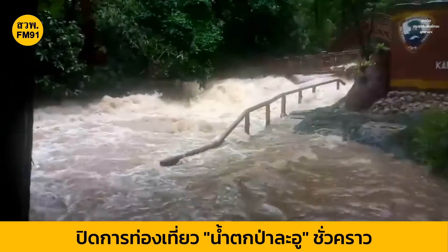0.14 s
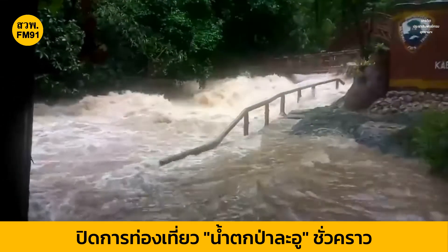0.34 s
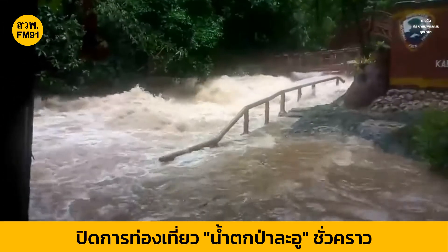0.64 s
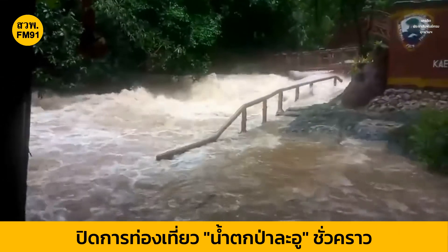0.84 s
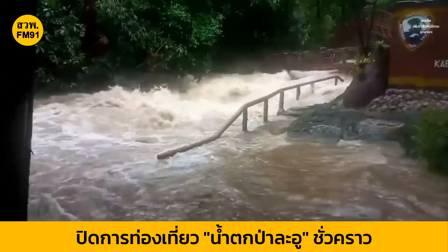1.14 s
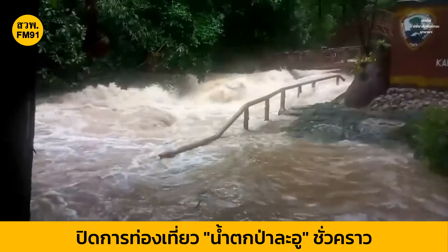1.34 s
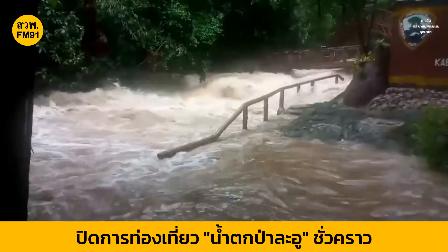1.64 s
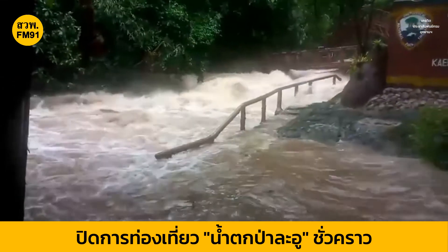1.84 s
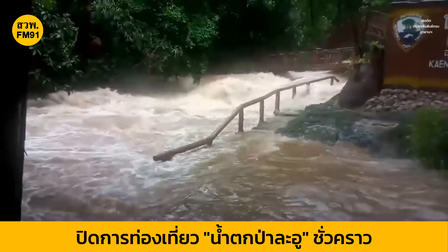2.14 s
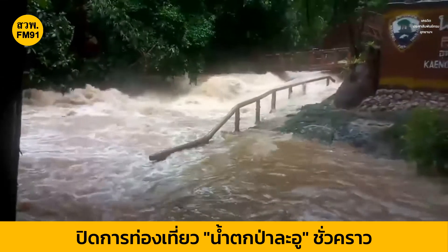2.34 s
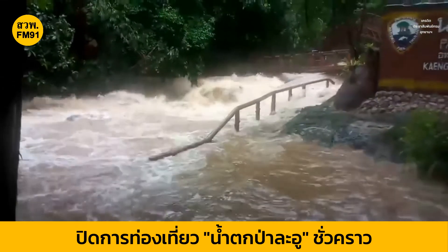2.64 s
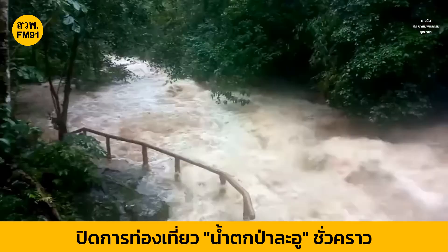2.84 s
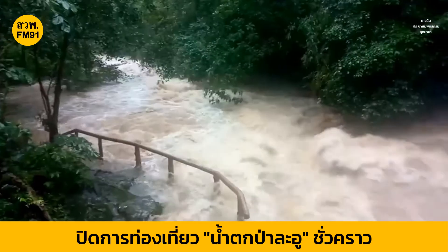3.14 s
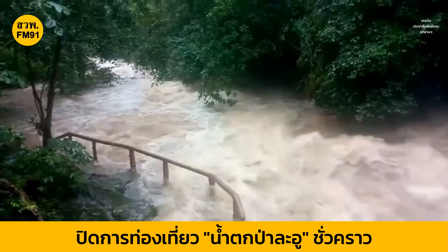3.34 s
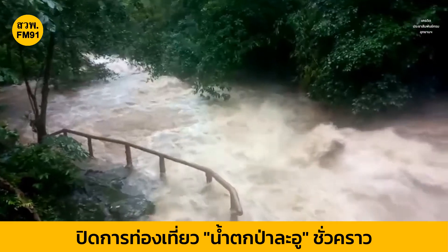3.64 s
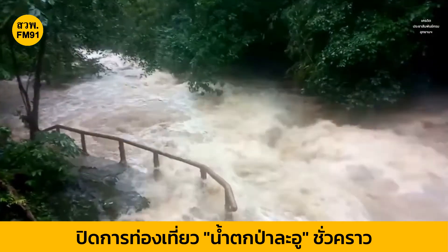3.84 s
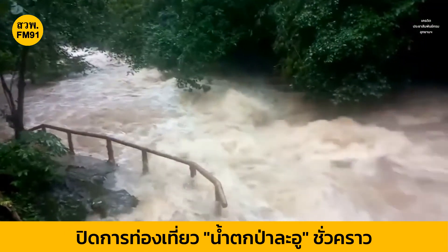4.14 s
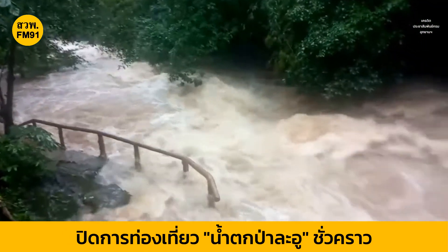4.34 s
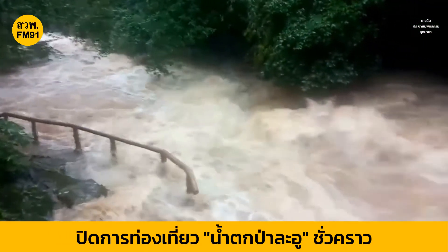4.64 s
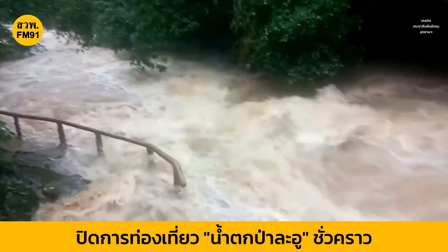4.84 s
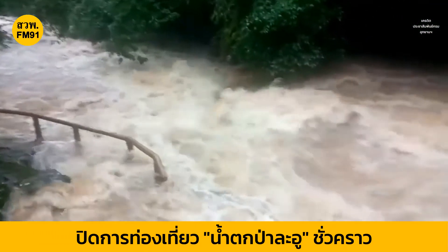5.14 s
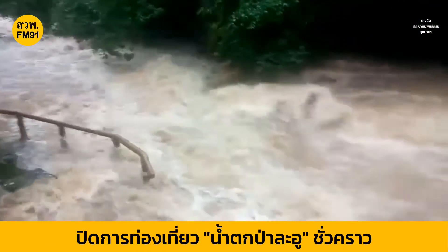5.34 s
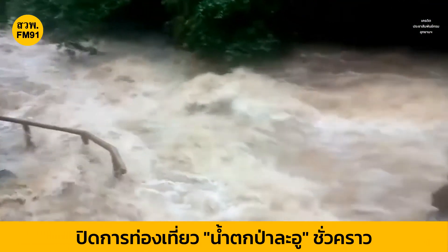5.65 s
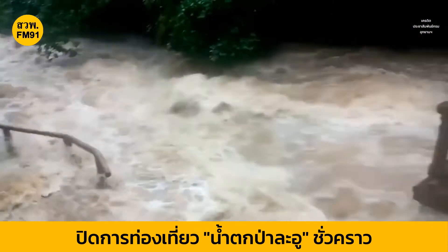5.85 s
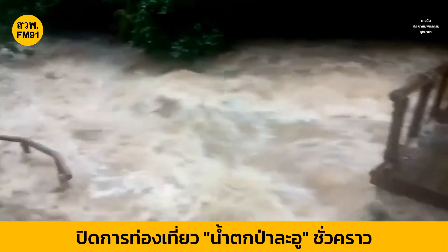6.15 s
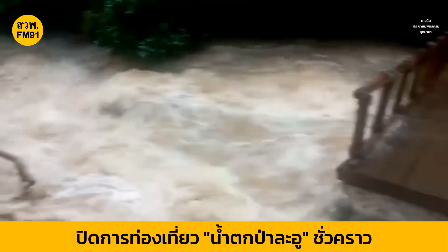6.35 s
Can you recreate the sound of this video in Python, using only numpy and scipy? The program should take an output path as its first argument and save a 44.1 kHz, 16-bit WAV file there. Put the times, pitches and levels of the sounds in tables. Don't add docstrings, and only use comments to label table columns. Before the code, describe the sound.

A swollen brown river roars over rocks, a wide unbroken rush with heavy low rumble. Just before the middle it is chopped off into complete silence for half a second. A brighter, hissier torrent then fades in fast and holds to the end. Outdoors on the bank, captured by a small mono microphone with edgy treble and brief compressed warbles.

```python
import sys
import numpy as np
from scipy import signal
from scipy.io import wavfile
from scipy.ndimage import uniform_filter1d

SR = 44100
rng = np.random.default_rng(int(sys.argv[2]) if len(sys.argv) > 2 else 0)


def transcribe(u):
    v = np.clip(np.atleast_2d(u).T, -1, 1)
    q = np.round(v * 32767).astype(np.int16)
    wavfile.write(sys.argv[1], SR, q)


def amplitude_ratio(level_db):
    exponent = np.asarray(level_db, float) / 20
    return 10 ** exponent


N = 286209

# frequency in Hz, density in dB per Hz.
UPSTREAM_ROAR_DB = [(25, -36), (50, -21), (97, 1), (180, 1), (470, -8.5), (620, -12), (2110, -8.5),
                    (5300, -13.5), (6600, -9), (7600, -11.5), (8200, -19), (9100, -22.5), (10400, -20),
                    (13600, -28)]
# frequency in Hz, density in dB per Hz.
FALLS_ROAR_DB = [(25, -42.5), (82, 0), (185, 2.5), (480, -7.5), (624, -4), (1070, -1), (1260, -6),
                 (1700, -3), (5000, -8.5), (6700, -0.5), (7500, -3), (8200, -11.5), (9320, -15.5),
                 (13200, -22)]
# time in seconds, level in dB, rumble over roar in dB.
UPSTREAM_SURGE = [
    (0.0, -22, -1),
    (2.74, -22, -0.5),
]
# time in seconds, level in dB, rumble over roar in dB.
FALLS_SURGE = [
    (3.6, -21.5, 0.0027),
    (5.76, -21.5, 0.005),
    (6.49, -21, 0.0),
]
# centre of first frame in seconds, length in frames.
STARVED_SPELLS = [(.073, 3), (.166, 1), (.375, 1), (.538, 2), (.886, 1), (1.002, 1), (1.443, 1), (1.536, 1),
                  (1.675, 1), (1.977, 1), (2.395, 1), (2.72, 1), (3.51, 1), (3.719, 6), (3.951, 1),
                  (4.206, 1), (4.253, 1), (4.624, 1), (4.88, 1), (4.926, 2), (5.042, 1), (5.251, 1),
                  (6.11, 1), (6.482, 1)]
# time in seconds, number of bands.
SPLIT_FRAMES = [
    (1.51, 1),
    (1.649, 3),
    (1.881, 2),
    (2.508, 4),
    (3.321, 2),
    (4.575, 1),
    (4.9, 1),
]
# frequency in Hz, band level over step in dB.
STEREO_FINENESS_DB = [(200, 22.5), (800, 15), (1600, 12), (4000, 11), (6300, 14), (8600, 8), (12500, 5.5),
                      (14500, 10.5)]

HOP = 1024
LINK_GRID, STEREO_GRID = 156, 28
LINK_TOP_LINE, STEREO_TOP_LINE = 731, 735
LINE_HZ = (np.arange(HOP) + .5) * SR / (2 * HOP)


def bubbles(per_s, spread_db, cycles, count=16):
    out = np.zeros(N)
    for hz in np.geomspace(150, 15000, count):
        t = np.arange(int(4 * cycles * SR / hz)) / SR
        rising = np.sin(2 * np.pi * hz * t * (1 + .04 * hz * t / cycles))
        chirp = rising * t * np.exp(-2 * hz * t / cycles)
        chance, size = rng.random(N), rng.exponential(1, N)
        bursts = chance < per_s * hz / 1e5 / SR
        train = bursts * amplitude_ratio(spread_db * np.minimum(size, 5))
        out += np.sqrt(hz) * evened(signal.oaconvolve(train, chirp)[:N])
    return evened(out)


def evened(x):
    return x / np.sqrt(np.mean(x ** 2) + 1e-20)


def read(points, hz):
    table_hz, table_db = np.transpose(points)
    return np.interp(np.log(hz + 1), np.log(table_hz + 1), table_db)


def microphone_db(hz):
    lift_hz, lift_width_hz, lift_db = 14020, 290, 9
    port_hz, port_width_hz, port_db = 6570, 210, 1.5
    lift = lift_db * np.clip((hz - lift_hz) / lift_width_hz, 0, 1)
    return lift + port_db / (1 + (2 * (hz - port_hz) / port_width_hz) ** 2)


def torrent(churn, roar, surge, patchy_db, gust_db):
    hz, t, z = signal.stft(churn, SR, nperseg=2048, noverlap=1536)
    mean_power = np.mean(abs(z) ** 2, 1)
    z = z / np.sqrt(uniform_filter1d(mean_power, size=9))[:, None]
    patches = uniform_filter1d(rng.standard_normal(z.shape), size=12, axis=0)
    patches = evened(uniform_filter1d(patches, size=7, axis=1))
    patches *= (1 + 1.5 * hz / 1e4)[:, None]
    gusts = evened(uniform_filter1d(rng.standard_normal(len(t)), size=3))
    surge_s, level_db, rumble_db = np.transpose(surge)
    colour_db = read(roar, hz) + microphone_db(hz)
    rumble_share = 1 / (1 + (hz / 350) ** 4)
    field_db = colour_db[:, None] + np.outer(rumble_share, np.interp(t, surge_s, rumble_db))
    field_db += patchy_db * patches + gust_db * gusts
    z = z * amplitude_ratio(field_db) * (hz < 15900)[:, None]
    water = signal.istft(z, SR, nperseg=2048, noverlap=1536)[1][:N]
    return evened(water) * amplitude_ratio(np.interp(np.arange(N) / SR, surge_s, level_db) + 1.0)


def upstream(churn):
    cut_s, cut_fall_s = 2.7595, .0027
    t = np.arange(N) / SR
    cut = np.clip((cut_s + cut_fall_s - t) / cut_fall_s, 0, 1) ** 2
    return cut * torrent(churn, UPSTREAM_ROAR_DB, UPSTREAM_SURGE, patchy_db=0.42, gust_db=0.29)


def falls(churn):
    fade_s, fade_rise_s, fade_start = 3.2617, .29, .06
    t = np.arange(N) / SR
    fade = (t > fade_s) * np.clip(fade_start + (t - fade_s) / fade_rise_s, 0, 1)
    return fade * torrent(churn, FALLS_ROAR_DB, FALLS_SURGE, patchy_db=0.25, gust_db=0.5)


def scene():
    churn = rng.standard_normal(N) + amplitude_ratio(-5.0) * bubbles(per_s=40000, spread_db=3.5, cycles=5.0)
    return np.tile(upstream(churn) + falls(churn), (2, 1))


def reframed(x, grid, window, change):
    basis = np.cos(np.pi / HOP * np.outer(np.arange(2 * HOP) + (HOP + 1) / 2, np.arange(HOP) + .5))
    basis *= window[:, None] * np.sqrt(2 / HOP)
    blocks = np.pad(x, (2 * HOP - grid, 2 * HOP + (grid - N) % HOP)).reshape(-1, HOP)
    lines = np.hstack([blocks[:-1], blocks[1:]]) @ basis
    frames = change(lines) @ basis.T
    return (frames[1:, :HOP] + frames[:-1, HOP:]).ravel()[HOP - grid:][:N]


def frame_at(s, grid):
    return np.round((np.asarray(s) * SR - grid) / HOP).astype(int) + 1


def starve(lines):
    step_db, scatter_db, edge_finer_db, bass_hz, treble_hz = 1.8, .5, 1.3, 550, 9500
    rows = np.concatenate([frame_at(s, LINK_GRID) + np.arange(frames) for s, frames in STARVED_SPELLS])
    starved = lines[rows]
    nearby = uniform_filter1d(starved ** 2, size=24, axis=1) + 1e-12
    edges = (LINE_HZ < bass_hz) | (LINE_HZ > treble_hz)
    row_db = step_db - edge_finer_db * edges + scatter_db * rng.standard_normal((len(rows), 1))
    step = amplitude_ratio(row_db) * nearby ** (1 / 4)
    out = lines.copy()
    out[rows] = step * np.sign(starved) * (abs(starved) > step / 2)
    out[:, LINK_TOP_LINE:] = 0
    return out


def scramble(lines, split):
    finest_db = -36.0
    band_roots = np.sqrt(abs(lines)).reshape(len(lines), -1, 32)
    typical = np.repeat(np.mean(band_roots, 2) ** 2, 32, 1)
    finest = amplitude_ratio(finest_db) * np.sqrt(np.mean(lines ** 2, 1, keepdims=True) + 1e-12)
    step = np.maximum(typical * amplitude_ratio(-read(STEREO_FINENESS_DB, LINE_HZ)), finest)
    count = np.floor((abs(lines) / step) ** (3 / 4) + .4054)
    out = step * np.sign(lines) * count ** (4 / 3)
    for (s, bands), band in zip(SPLIT_FRAMES, split):
        out[frame_at(s, STEREO_GRID), band] *= rng.choice([-1., 1.], band.sum())
    out[:, STEREO_TOP_LINE:] = 0
    return out


def band_limit(x):
    return signal.sosfilt(signal.butter(12, 17010, fs=SR, output="sos"), x)


def record(dry):
    split_low_hz, split_width_hz, split_bands = 4300, 1400, 8
    mute_start_s, mute_end_s = 2.795, 3.2585
    sine = np.sin(np.pi * (np.arange(2 * HOP) + .5) / (2 * HOP))
    mono = reframed(dry[0], LINK_GRID, sine, starve)
    kbd = signal.windows.kaiser_bessel_derived(2 * HOP, 4 * np.pi)
    band_of_line = (LINE_HZ - split_low_hz) // split_width_hz
    split = [np.isin(band_of_line, rng.permutation(split_bands)[:bands]) for s, bands in SPLIT_FRAMES]
    pair = np.array([reframed(mono, STEREO_GRID, kbd, lambda lines: scramble(lines, split)) for _ in dry])
    pair[:, int(mute_start_s * SR):int(mute_end_s * SR)] = 0
    return band_limit(pair)


dry = scene()
out = record(dry)
transcribe(out)
```